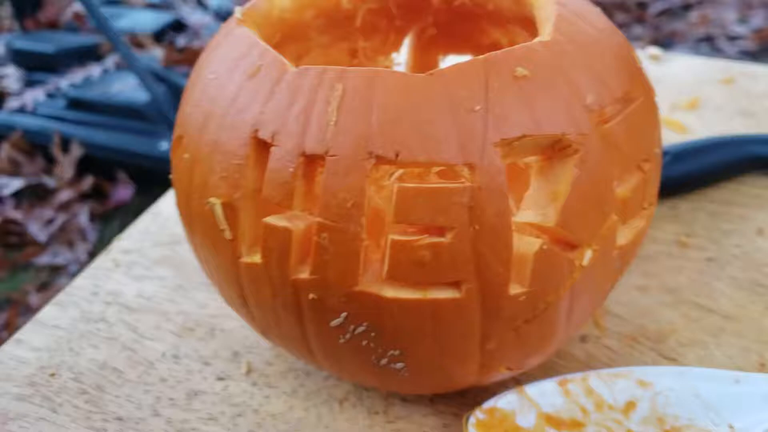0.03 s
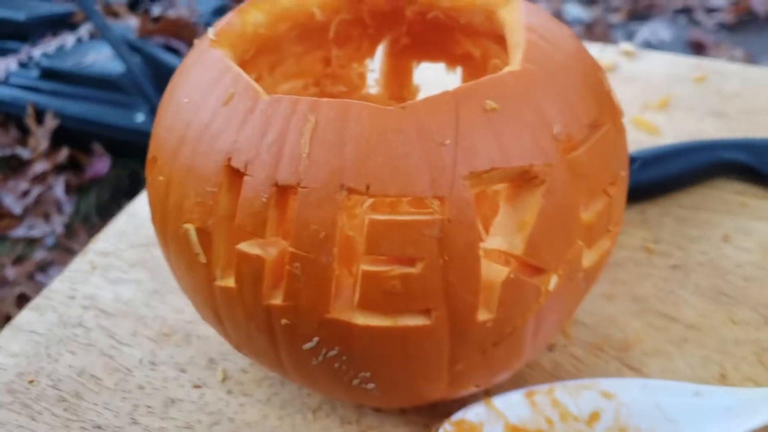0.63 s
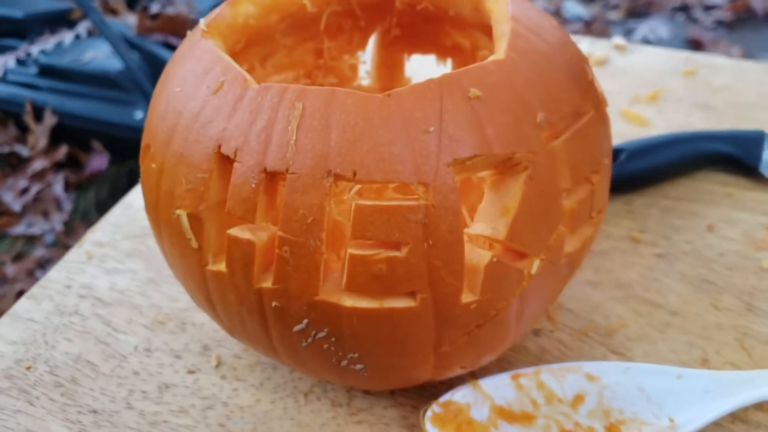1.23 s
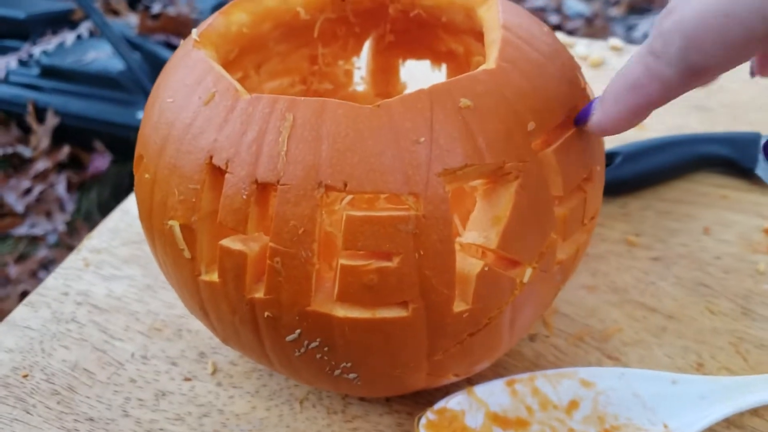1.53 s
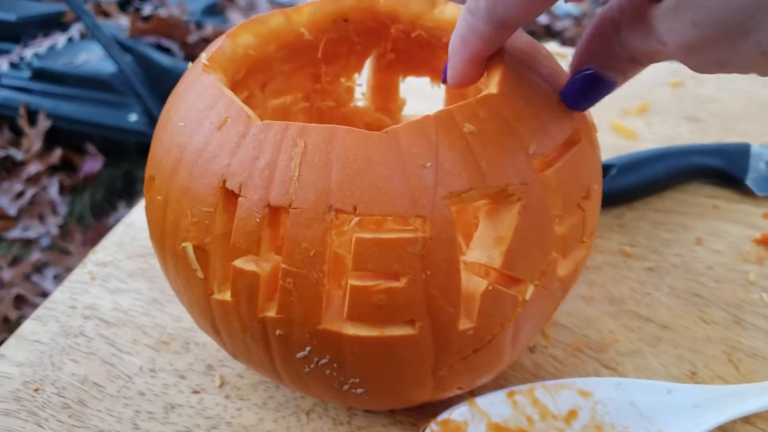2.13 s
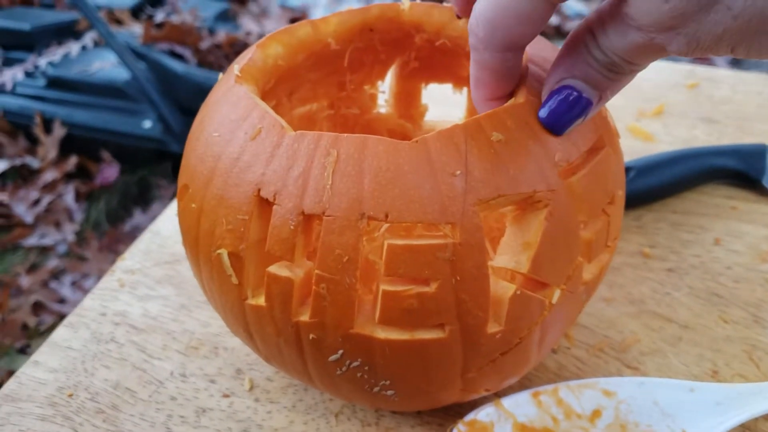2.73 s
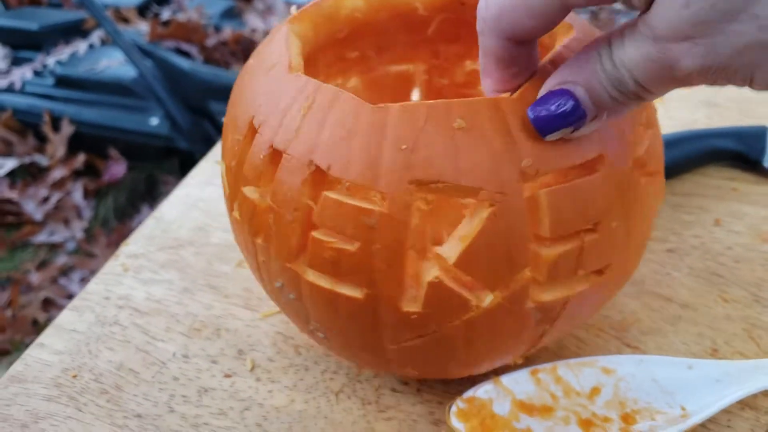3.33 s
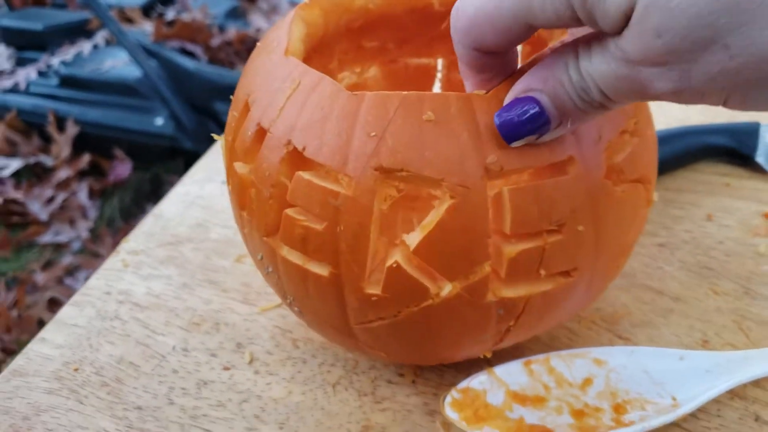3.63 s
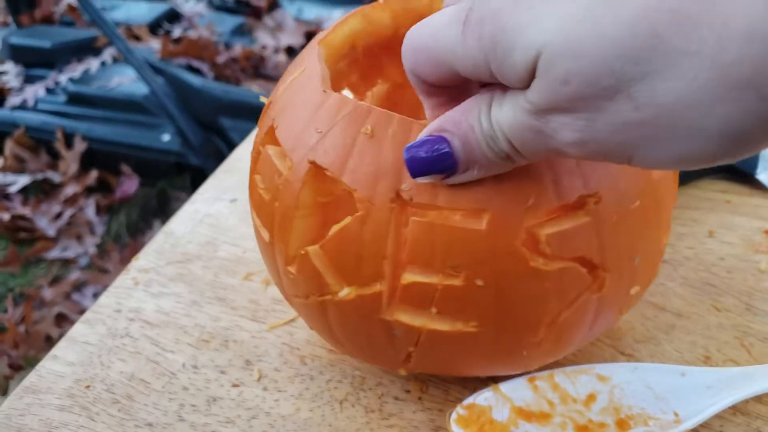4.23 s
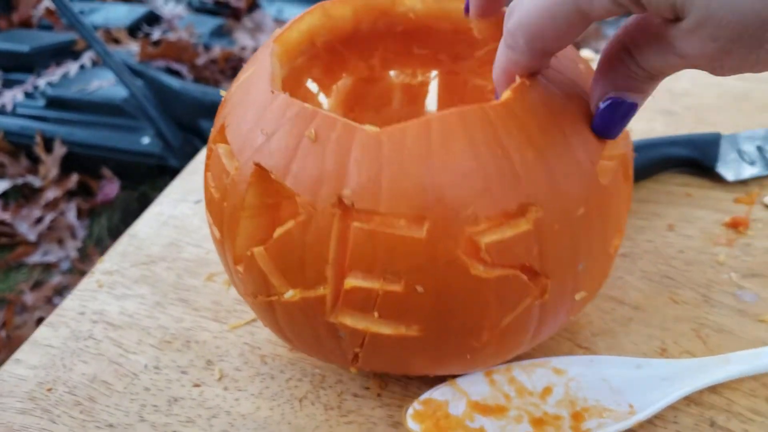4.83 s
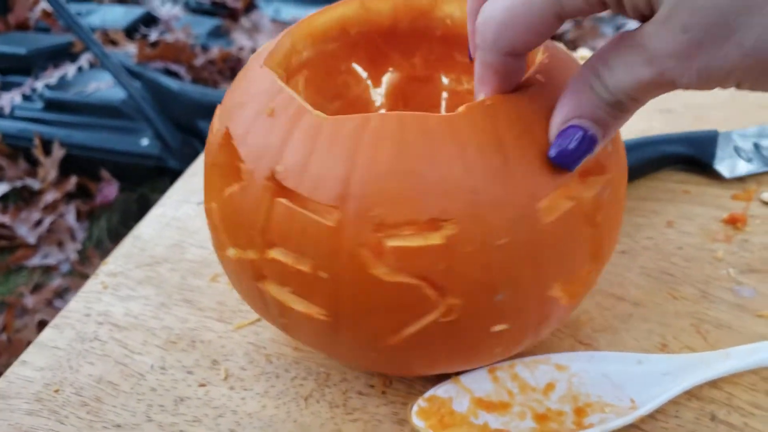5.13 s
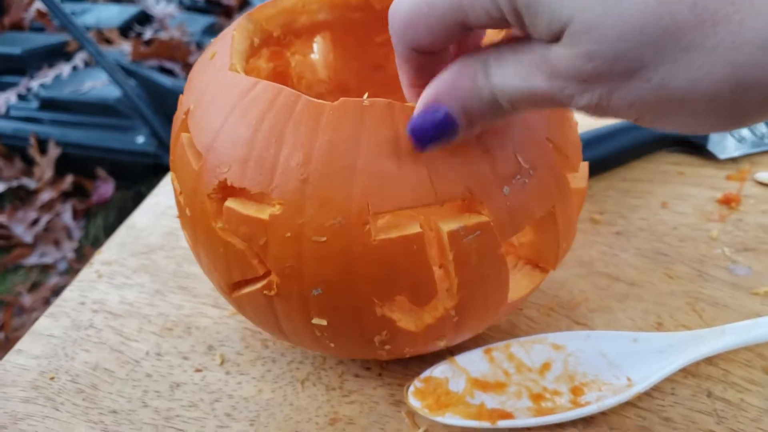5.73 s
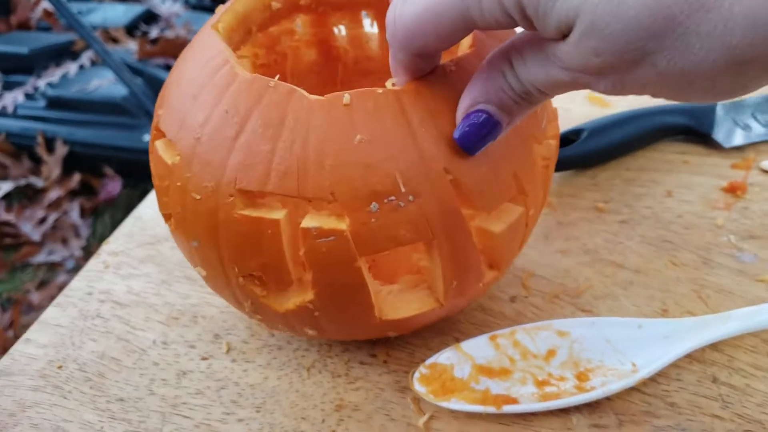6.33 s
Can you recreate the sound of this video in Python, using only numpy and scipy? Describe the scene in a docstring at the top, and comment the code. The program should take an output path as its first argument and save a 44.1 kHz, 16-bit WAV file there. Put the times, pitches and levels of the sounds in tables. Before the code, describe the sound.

Gusts hit a phone microphone in the open air, thumping and rumbling unevenly from side to side, with a brief hiss on the left and several small, sharp ticks close by. After the first second or so the wind drops to a gentle, puffing breeze. Faint isolated clicks sound as a pumpkin is handled, and a soft hiss of distant air slowly grows toward the end.

```python
"""Wind buffets the two microphone ports (openings) of a phone outdoors. Swirls of air, called eddies,
push and pull at each port, making a rumble, a flutter and single thumps. The gusts ease to a puffing
breeze over the rush of distant air and trees and the microphones' own fine hiss. A brighter hiss fills
the left side for the first second, and a few sharp ticks sound right at the phone's case."""
import sys
import numpy as np
from scipy import signal
from scipy.fft import rfft, irfft, next_fast_len
from scipy.io import wavfile
from scipy.ndimage import uniform_filter1d, map_coordinates

SR = 44100
rng = np.random.default_rng(int(sys.argv[2]) if len(sys.argv) > 2 else 0)


def inscribe(sig):
    """Save sig as 16-bit PCM at rate SR to the path in sys.argv[1].

    A 1-D sig is mono; a 2-D sig holds one channel per row.
    Samples are clipped to [-1, 1] before scaling.
    """
    pcm = np.round(np.clip(np.atleast_2d(sig).T, -1, 1) * 32767)
    wavfile.write(sys.argv[1], SR, pcm.astype(np.int16))


N = 281358

# Loudness of the microphones' hiss, and of a very high sizzle in the first second: time_s, level_db
MIC_HISS_LEVEL = [(.1, -63), (.95, -58), (1.05, -60), (3.45, -58.5), (3.55, -56.5), (6.38, -54.5)]
SIZZLE_LEVEL = [(.1, -57), (.4, -59.5), (.6, -61), (.9, -61), (.99, -58), (1.05, -90)]
# Their tone, meaning how strong each pitch is next to the others: pitch_hz, gain_db
MIC_HISS_LEFT_TONE = [(300, 1), (5000, -2), (7800, -2.5), (9500, 0.5), (13500, -0.5), (16000, -3.5)]
MIC_HISS_RIGHT_TONE = [(300, 5), (2600, -5), (3300, -20), (4800, -3), (7500, -6), (9000, 0.5), (13000, 0),
                       (16000, -0.5)]
SIZZLE_TONE = [(7500, -45), (8800, -3), (10700, -2), (11900, 1), (14000, 4), (16000, -9.5)]

# Loudness of the distant air, which drops at about 1 s and slowly rises again: time_s, level_db
DISTANT_LEVEL = [(.11, -50), (.93, -53), (1.05, -60), (2.1, -55.5), (2.4, -58.5), (3.42, -54.5),
                 (3.53, -51.5), (5.7, -49), (6.37, -46.5)]
# Its low roar compared with its rush; the roar draws nearer at the end: time_s, gain_db
ROAR_GAIN = [(1.1, -5), (2.4, -6), (5.2, -2), (5.9, 0.5)]
# Tone of the rush at each port, and of the roar: pitch_hz, gain_db
RUSH_LEFT_TONE = [(100, -30), (400, 0), (580, -6), (740, -2.5), (860, -2.5), (1080, 0.5), (1500, -2.5),
                  (2500, -2.5), (3100, -9), (4200, -6), (5800, -13), (7600, -17.5), (15000, -42)]
RUSH_RIGHT_TONE = [(100, -17), (400, -3), (590, -4), (740, 0), (850, -2.5), (1060, 0), (1500, -2.5),
                   (2550, -2.5), (3150, -13), (4400, -9.5), (5800, -16), (7600, -19.5), (15000, -31)]
ROAR_TONE = [(25, -16), (70, 2.5), (130, 1), (230, 0), (310, -2), (420, -13.5), (600, -28), (1200, -63)]
# How alike far sound is at the two spaced ports: pitch_hz, likeness (1 same, -1 opposite)
PORT_LIKENESS = [(250, 0.98), (550, 0.73), (700, 0.39), (850, 0.17), (1050, -0.47), (1400, -0.58),
                 (1900, 0.085), (2400, 0.36), (3500, -0.097)]

# Loudness of the bright hiss on the left, and of the thin whistle in it: time_s, level_db
LEFT_HISS_LEVEL = [(.1, -49.5), (.5, -47), (.8, -45.5), (.98, -46.5), (1.03, -69), (1.1, -100)]
WHISTLE_LEVEL = [(.5, -90), (.6, -58), (.77, -57), (.87, -90)]
# Tone of that hiss: pitch_hz, gain_db
LEFT_HISS_TONE = [(400, -15), (1100, -2.5), (2000, -5), (3000, -2), (3700, 0), (5000, -4.5), (7250, -6.5),
                  (8200, -22), (11000, -23), (16000, -20)]

# Ticks on the case, led at 0.547 s by a faint rustle played the same way: start_s, snap_gain_db, knock_gain_db,
# right_vs_left_db
TICKS = [(.547, -46, -37.5, 12), (0.734, -33, -26.5, -16), (0.8394, -23, -25, -10), (.869, -27, -26, -13),
         (0.9124, -24, -23, -11), (0.9588, -22, -27, -16), (2.0925, -40, -30.5, 2), (2.1737, -31, -27, 0.5),
         (3.4859, -31.5, -29, 0.5), (4.9567, -30, -24, 2), (5.7825, -28, -20.5, -2)]
# The case's brief ringing tones: pitch_hz, left_db, right_db, fade_s (time to fall by 60 dB)
CASE_RINGS = [(1130, -1, -4, 0.0016), (2720, -13, -4.5, 0.0026), (6240, 4, -14, 0.00063),
              (10850, -0.5, 0.5, 0.0007), (14200, -3, -11, 0.0011)]

# Short flurries of finely churning air: middle_s, level_db, half_length_s, port (0 left, 1 right)
FLURRIES = [(0.399, -37, 0.0064, 0), (0.875, -43, 0.036, 1), (1.007, -37, 0.019, 1),
            (1.025, -32, 0.0059, 0), (1.255, -44.5, 0.0079, 1), (1.421, -42, 0.026, 1),
            (1.53, -51.5, 0.04, 1)]
# Single strong eddies: middle_s, peak_db, pitch_hz, port (0 left, 1 right)
STRONG_EDDIES = [(.32, -17, 89, 1), (0.346, -22.5, 129, 0), (0.3948, -8, 135, 0), (.496, -19, 141, 0),
                 (0.672, -19.5, 91, 0), (0.782, -15.5, 145, 1), (0.896, -12.5, 134, 1), (.927, -9.5, 91, 0),
                 (.988, -11, 158, 1), (1.026, -19.5, 214, 0), (1.256, -23.5, 142, 0),
                 (1.409, -22.5, 129, 0), (2.204, -29, 113, 1), (4.739, -22.5, 87, 0)]
# Tone of the flurries, and of the wind's deep rumble: pitch_hz, gain_db
FLURRY_TONE = [(60, -20), (170, -4), (280, -0.5), (420, -6.5), (600, -19), (1000, -33), (3000, -90)]
RUMBLE_TONE = [(12, -30), (25, -12), (42, -4), (68, 1.5), (100, -2), (150, -10), (210, -19), (300, -24),
               (450, -36.5), (900, -67), (2000, -100)]
# The breeze between gusts: time_s, strength_db
BREEZE = [(.11, -42), (.3, -32.5), (.55, -37), (1.0, -31.5), (1.33, -43), (1.68, -40.5), (2.03, -50.5),
          (2.48, -54), (2.85, -45), (3.25, -45.5), (3.41, -56), (3.49, -42.5), (4.15, -46), (4.4, -41.5),
          (5.1, -47), (5.7, -49), (6.3, -41)]
# Gusts that swell and fade in a bell shape: middle_s, left_db, right_db, half_length_s
GUSTS = [(0.458, -28, -36, 0.054), (0.767, -36, -28.5, 0.044), (0.862, -23.5, -20.5, 0.024),
         (0.942, -22.5, -23, 0.056), (1.119, -44, -26.5, 0.012), (1.252, -30.5, -33, .022),
         (1.454, -29.5, -50, 0.063), (1.558, -40, -34.5, 0.019), (1.79, -35.5, -39.5, 0.037),
         (1.92, -43, -38, .018), (2.204, -42, -44, 0.051), (2.645, -39.5, -63, 0.029),
         (3.48, -40.5, -45, .02), (3.739, -41, -36, 0.017), (3.972, -43, -40, 0.018),
         (4.572, -35, -57, 0.031), (4.753, -33.5, -50, 0.065), (5.334, -39.5, -37.5, 0.021)]


def amp(db):
    """Turn decibels into a number to multiply by."""
    return 10 ** (np.asarray(db) / 20)


def unit(x):
    """Scale each channel to an average (rms) level of 1."""
    return x / np.sqrt(np.mean(x ** 2, axis=-1, keepdims=True) + 1e-20)


def at_pitch(table, hz):
    """Read a table between its pitches, giving each octave equal room."""
    pitches, values = np.transpose(table)
    return np.interp(np.log(hz + 1), np.log(pitches + 1), values)


def over_time(table):
    """Join a table's points with straight lines, giving one value per sample."""
    times, values = np.transpose(table)
    return np.interp(np.arange(N) / SR, times, values)


def wobble(per_s):
    """A smooth curve through per_s random points a second."""
    points = rng.standard_normal(int(N * per_s / SR) + 4)
    return map_coordinates(points, [np.arange(N) * per_s / SR])


def filtered(x, response):
    """Multiply each pitch in x by response(hz)."""
    size = next_fast_len(N + SR // 2)
    return irfft(rfft(x, size) * response(np.fft.rfftfreq(size, 1 / SR)), size)[..., :N]


def coloured(x, tone):
    """Give noise the tone in a table, at an average level of 1."""
    return unit(filtered(x, lambda hz: amp(at_pitch(tone, hz))))


def white():
    """Separate plain noise for each port."""
    return rng.standard_normal((2, N))


def microphone_hiss():
    """The microphones' own fine hiss, plus a high sizzle during the early gusts."""
    left, right = white()
    hiss = np.array([coloured(left, MIC_HISS_LEFT_TONE), coloured(right, MIC_HISS_RIGHT_TONE)])
    sizzle = coloured(white(), SIZZLE_TONE)
    return amp(over_time(MIC_HISS_LEVEL)) * hiss + amp(over_time(SIZZLE_LEVEL)) * sizzle


def all_around(lag_s=.00005):
    """Noise from every side: partly alike at the two ports, and a shade later at the right one."""
    def shares(hz):
        angle = np.arccos(np.clip(at_pitch(PORT_LIKENESS, hz), -1, 1)) / 2
        return np.array([np.cos(angle), np.sin(angle)])
    shared, opposite = filtered(white(), shares)
    right = filtered(shared - opposite, lambda hz: np.exp(-2j * np.pi * hz * lag_s))
    return np.array([shared + opposite, right])


def patchy(x, depth_db=1.4):
    """Make patches a few hundred Hz wide swell and fade within a tenth of a second."""
    grid = signal.stft(x, nperseg=1024)[2]
    patches = uniform_filter1d(rng.standard_normal(grid.shape[1:]), size=6, axis=0)  # blur in pitch
    patches = uniform_filter1d(patches, size=7, axis=1)  # blur in time
    return signal.istft(grid * amp(depth_db * patches / patches.std()))[1][:, :N]


def distant_air(right_db=-0.86, rush_sway_db=1.0, roar_sway_db=3.0):
    """Far air and trees rush over a low roar; each port gives the rush its own tone."""
    left, right = patchy(all_around())
    rush = np.array([coloured(left, RUSH_LEFT_TONE), amp(right_db) * coloured(right, RUSH_RIGHT_TONE)])
    roar = coloured(all_around(), ROAR_TONE)
    rush *= amp(rush_sway_db * wobble(per_s=12))
    roar *= amp(over_time(ROAR_GAIN) + roar_sway_db * wobble(per_s=9.1))
    return amp(over_time(DISTANT_LEVEL)) * (rush + roar)


def left_hiss(whistle_hz=5611):
    """A bright hiss with a faint whistle, on the left only."""
    hiss = amp(over_time(LEFT_HISS_LEVEL)) * coloured(rng.standard_normal(N), LEFT_HISS_TONE)
    whistle = np.sqrt(2) * np.sin(2 * np.pi * whistle_hz * np.arange(N) / SR)
    return np.array([hiss + amp(over_time(WHISTLE_LEVEL)) * whistle, np.zeros(N)])


def ringing(t, hz, fade_s):
    """A vibration that dies away by 60 dB in fade_s."""
    return -np.sin(2 * np.pi * hz * t) * amp(-60 * t / fade_s)


def case_ticks(rise_s=0.00015, lag_s=.00025, boost_db=1):
    """Each tick is a tiny snap and a dull knock of the case, reaching the left port first."""
    out, t = np.zeros((2, N)), np.arange(SR // 50) / SR
    knock = ringing(t, hz=560, fade_s=0.0044) * (1 - np.exp(-t / rise_s))
    for start_s, snap_db, knock_db, right_db in TICKS:
        for port in range(2):
            start = round((start_s + port * lag_s) * SR)
            snap = sum(amp(port_db[port] + rng.standard_normal()) * ringing(t, hz, fade_s)
                       for hz, *port_db, fade_s in CASE_RINGS)
            tick = amp(snap_db) * snap + amp(knock_db) * knock
            out[port, start:start + len(t)] += amp(boost_db + port * right_db) * tick
    return out


def churn(tone, even_s):
    """The noise of churning air, kept even in strength over spans longer than even_s."""
    pressure = coloured(white(), tone)
    power = uniform_filter1d(pressure ** 2, max(int(even_s * SR), 2), axis=1)
    return unit(pressure / np.sqrt(np.abs(power) + 1e-6))


def flurries():
    """Brief flurries of air flap at one port, higher in pitch than the rumble."""
    strength, t = np.zeros((2, N)), np.arange(N) / SR
    for middle_s, level_db, half_length_s, port in FLURRIES:
        strength[int(port)] += amp(level_db) * np.exp(-.5 * ((t - middle_s) / half_length_s) ** 2)
    return strength * churn(FLURRY_TONE, even_s=.03)


def eddy(t, hz, width_cycles=0.45):
    """An eddy crossing a port sucks once, with a smaller push before and after."""
    return -np.cos(2 * np.pi * hz * t) * np.exp(-.5 * (hz * t / width_cycles) ** 2)


def strong_eddies():
    """Single strong eddies thump one port each."""
    out, t = np.zeros((2, N)), np.arange(N) / SR
    for middle_s, peak_db, pitch_hz, port in STRONG_EDDIES:
        out[int(port)] += amp(peak_db) * eddy(t - middle_s, pitch_hz)
    return out


def small_eddies(per_s=60, pitch_hz=174, pitch_spread=0.2, scatter_db=2.5):
    """A stream of eddies of random size and strength flutters past a port."""
    count = per_s * N // SR
    pitch, strength = rng.standard_normal((count, 2)).clip(-2, 2).T
    middles = ((np.arange(count) + rng.random(count)) * N / count).astype(int)
    offsets = np.arange(-(SR // 40), SR // 40)
    places = (middles[:, None] + offsets) % N
    hz = pitch_hz * np.exp(pitch_spread * pitch)
    pulses = amp(scatter_db * strength)[:, None] * eddy(offsets / SR, hz[:, None])
    return unit(np.bincount(places.ravel(), pulses.ravel(), N))  # add each pulse at its place


def wind_strength_db(shelter_db=-4.5, left_puff_db=3, right_puff_db=7, puffs_per_s=15):
    """A breeze with gusts on top; the more sheltered right port catches it in fitful puffs."""
    left = left_puff_db * wobble(puffs_per_s)
    right = shelter_db + right_puff_db * np.minimum(wobble(puffs_per_s), 1)
    power = amp(over_time(BREEZE) + np.array([left, right])) ** 2
    t = np.arange(N) / SR
    for middle_s, left_db, right_db, half_length_s in GUSTS:
        power += amp([[left_db], [right_db]]) ** 2 * np.exp(-((t - middle_s) / half_length_s) ** 2)
    return 10 * np.log10(power)


def wind_buffeting(rumble_db=-1.5, flutter_db=-10.5, lumps_db=3, brighten=0.21, strong_wind_db=-25):
    """Air churns in uneven lumps at each port; faster wind sheds more small eddies, so it flutters more."""
    wind_db = wind_strength_db()
    lumps = amp(lumps_db * np.array([wobble(per_s=35), wobble(per_s=35)]).clip(-2, 1.5))
    rumble = unit(lumps * churn(RUMBLE_TONE, even_s=0.0555))
    flutter = unit(np.sqrt(lumps) * np.array([small_eddies(), small_eddies()]))
    flutter *= amp(brighten * (wind_db - strong_wind_db))
    return amp(wind_db + rumble_db) * rumble + amp(wind_db + flutter_db) * flutter


def scene():
    """Wind on the ports, with the distant air, the hisses and the ticks."""
    wind = wind_buffeting() + strong_eddies() + flurries()
    return wind + distant_air() + microphone_hiss() + left_hiss() + case_ticks()


def record(dry, start_s=.106, top_hz=15900):
    """The phone opens its microphones after a moment and keeps nothing above top_hz."""
    is_open = np.arange(N) / SR > start_s
    return filtered(dry * is_open, lambda hz: hz < top_hz)


dry = scene()
out = record(dry)
inscribe(out)
```